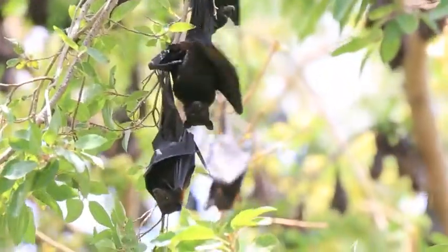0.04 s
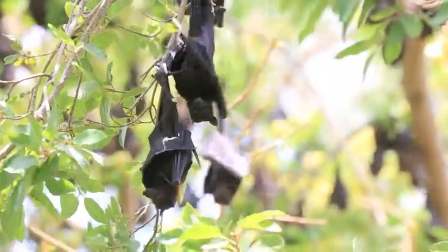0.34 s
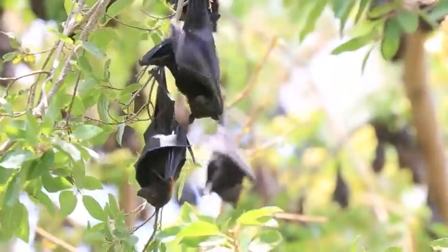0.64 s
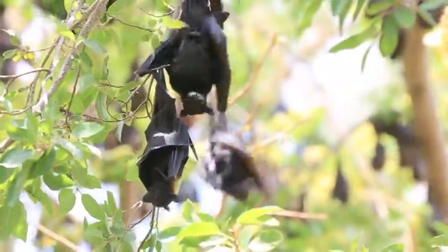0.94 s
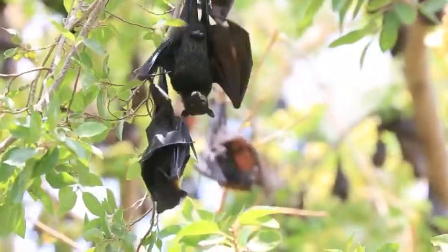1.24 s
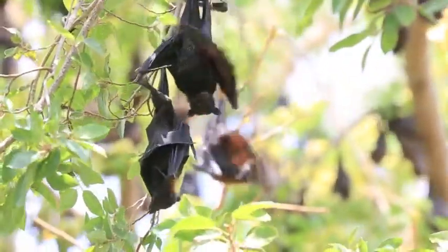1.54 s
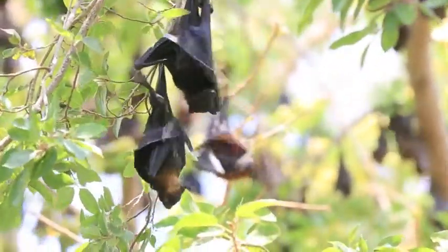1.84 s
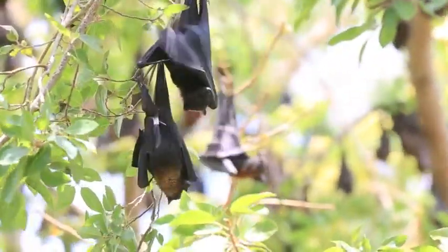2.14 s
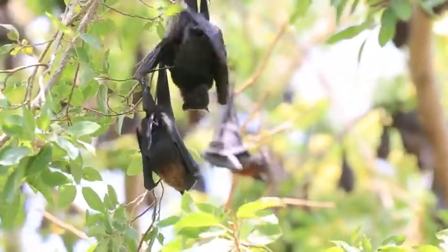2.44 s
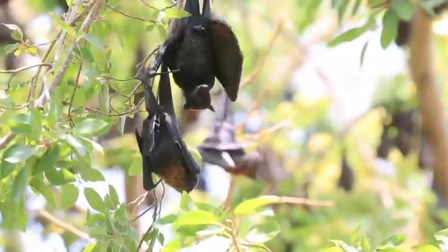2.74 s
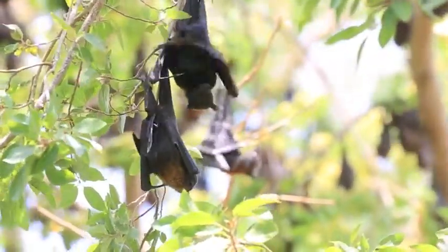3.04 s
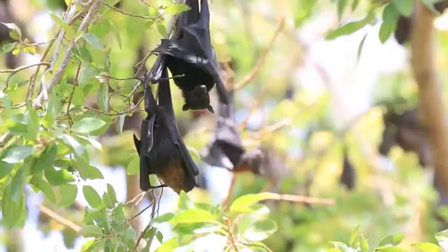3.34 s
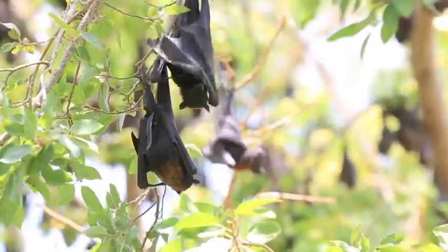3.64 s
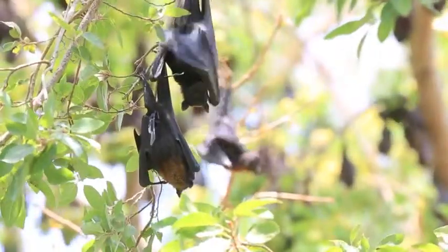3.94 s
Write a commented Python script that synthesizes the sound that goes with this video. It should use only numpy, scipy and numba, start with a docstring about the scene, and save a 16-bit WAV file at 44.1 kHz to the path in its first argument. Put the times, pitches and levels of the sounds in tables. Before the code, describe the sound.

Harsh screeches and squawks of quarrelling bats over faint colony chatter and low outdoor noise.

```python
"""Fruit bats squabble in a tree. First, thin whines break up into rasps, with a squeal between them and a
short growl. Hoarse screeches and a longer growl follow; last, a nearer bat squawks three times. Each
call is vocal fold vibration and pulsed breath noise filtered by the throat. Along the way the colony
squeaks and wings rustle; the trees scatter it all over a low outdoor background with a distant hum."""
import sys
import numpy as np
from scipy import signal
from scipy.fft import rfft, irfft
from scipy.io import wavfile
from scipy.ndimage import uniform_filter1d
from numba import njit

SR = 44100
rng = np.random.default_rng(int(sys.argv[2]) if len(sys.argv) > 2 else 0)


def file_out(sig):
    """Save sig as 16-bit WAV at sys.argv[1]."""
    # one column per channel
    cols = np.atleast_2d(sig).T
    # limit, then scale
    lim = np.clip(cols, -1, 1)
    pcm = np.round(lim * 32767).astype(np.int16)
    wavfile.write(sys.argv[1], SR, pcm)


N = 176400
TOP_HZ = 15750


def undb(db):
    """Amplitude ratio of a level in decibels."""
    return 10 ** (np.asarray(db) / 20)


def unit(x):
    """Normalisation to a standard deviation of 1."""
    return x / (np.std(x) + 1e-12)


def steady(x):
    """Division by the running rms, which flattens the envelope."""
    return x / np.sqrt(uniform_filter1d(x ** 2, SR // 35) + 1e-12)


def along(rows, column):
    """Linear interpolation of one table column over time."""
    rows = np.array(rows, float)
    return np.interp(np.arange(N) / SR, rows[:, 0], rows[:, column])


def colour(x, response):
    """Zero-phase filtering by a response given as (f/Hz, level/dB) points."""
    hz, db = np.array(response, float).T
    bin_hz = np.arange(N // 2 + 1) * SR / N
    return irfft(rfft(x) * undb(np.interp(np.log(bin_hz + 1), np.log(hz), db)), N)


def lowpass(x, hz, order):
    """Zero-phase low-pass filtering."""
    bin_hz = np.arange(N // 2 + 1) * SR / N
    return irfft(rfft(x) / (1 + (bin_hz / hz) ** order), N)


def wander(hz):
    """Band-limited random fluctuation with a standard deviation of 1."""
    return unit(lowpass(rng.standard_normal(N), hz, order=4))


def gate(start, end, edge_s):
    """Trapezoidal envelope between two times."""
    t = np.arange(N) / SR
    return np.clip(np.minimum(t - start, end - t) / edge_s + .5, 0, 1)


def phase_of(hz):
    """Phase as the time integral of frequency."""
    return 2 * np.pi * np.cumsum(hz) / SR


def vocal_folds(phase, harmonics, ring_harmonic, ring_db):
    """Harmonic series of a periodic vibration; each harmonic swells and fades on its own."""
    t = np.arange(N) / SR
    drift_hz, drift_db = 45.06, 4.5
    folds = 0
    for k in range(1, harmonics + 1):
        drift = np.interp(t * drift_hz, np.arange(N // 200), rng.standard_normal(N // 200))
        gain = undb(drift_db * drift + ring_db * (k == ring_harmonic))
        folds += gain * np.cos(k * phase + rng.uniform(0, 2 * np.pi))
    return unit(folds)


@njit
def mouth_resonance(x, hz, width_hz):
    """The mouth cavity as a second-order resonator with a moving centre frequency."""
    y, band_state, low_state = np.empty(len(x)), 0., 0.
    for i in range(len(x)):
        tuning, damping = np.tan(np.pi * hz[i] / SR), width_hz / hz[i]
        band = (band_state + tuning * (x[i] - low_state)) / (1 + tuning * (tuning + damping))
        band_state = 2 * band - band_state
        low_state += 2 * tuning * band
        y[i] = damping * band
    return y


def call(pitch, levels, throat, split_hz, jitter, waver, flutter, sidebands,
         rasp=.45, hoarse=.8, ring_harmonic=None, ring_db=0, mouth=False):
    """Source-filter principle: uneven vocal fold pulses and pulsed air excite the throat's resonances."""
    rough = np.clip(along(pitch, 2), 0, 1)
    hz = along(pitch, 1) * (1 + waver * wander(60.55) + jitter * rough * wander(427.4))
    phase = phase_of(hz)
    folds = vocal_folds(phase, int(TOP_HZ / np.median(hz)), ring_harmonic, ring_db)
    # in rough stretches a slower vibration modulates the folds and adds side tones
    slow_phase = phase / 5 + .5 * wander(70)
    subharmonics = sum(np.cos(k * slow_phase + rng.uniform(0, 2 * np.pi)) for k in (1, 2, 3))
    folds *= 1 + sidebands * rough * subharmonics
    breath = unit(rng.standard_normal(N) * (1 + 1.1 * np.cos(phase)))
    shimmer = np.exp(flutter * (.043 + rough) * wander(140))
    source = (np.sqrt(1 - rough ** 2) * folds + rasp * rough * breath) * shimmer
    if mouth:  # part of the source leaks past the resonance
        source = .25 * source + mouth_resonance(source, along(pitch, 3), width_hz=700.)
    body = lowpass(colour(source, throat), split_hz, order=16)
    # a hoarser mix supplies the band above split_hz
    hoarse_source = ((1 - rough) * folds * np.exp(.28 * wander(27)) + hoarse * breath) * shimmer
    treble = colour(hoarse_source, throat)
    treble -= lowpass(treble, split_hz, order=16)
    sound = steady(body) * undb(along(levels, 1)) + steady(treble) * undb(along(levels, 2))
    return sound * gate(levels[0][0], levels[-1][0], edge_s=.0078)


SQUAWK_PITCHES = [
    [(2.725, 580, .8), (2.752, 539, .35), (2.775, 548, .65), (2.8, 585, .75), (2.82, 580, .85),
     (2.845, 612, .75), (2.89, 581, .75), (2.96, 555, .8)],
    [(3.095, 595, .5), (3.12, 578, .65), (3.135, 540, .55), (3.16, 557, .8), (3.2, 542, .6),
     (3.255, 556, .6), (3.27, 489, .5), (3.29, 472, .55), (3.318, 550, .95), (3.345, 505, .55),
     (3.385, 482, .5), (3.405, 517, .85), (3.5, 496, .95)],
    [(3.63, 529, .6), (3.67, 554, .85), (3.7, 490, .95), (3.735, 445, .7), (3.77, 467, .5),
     (3.825, 470, .75), (3.87, 538, .9), (3.9, 513, .6), (3.925, 538, .9), (4, 490, .6)],
]  # contour per call: t/s, f/Hz, roughness (0-1)
SQUAWK_LEVELS = [
    [(2.72, -43, -48), (2.748, -27.5, -44), (2.772, -32, -46), (2.793, -27.5, -39), (2.885, -29, -40),
     (2.92, -36.5, -47), (2.96, -40.5, -41.5), (3.08, -53, -48.5)],
    [(3.095, -34, -41), (3.113, -25, -46), (3.14, -29.5, -41.5), (3.2, -33, -39), (3.3, -32, -41),
     (3.41, -31.5, -40.5), (3.5, -43.5, -51), (3.64, -61, -52)],
    [(3.635, -43, -47), (3.675, -31, -42), (3.72, -39.5, -45), (3.77, -31.5, -44.5), (3.85, -41, -47.5),
     (3.875, -34, -44.5), (3.905, -40, -50), (3.95, -33.5, -49), (4, -44, -61)],
]  # envelope per call: t/s, body level/dB, treble level/dB
SQUAWK_FORMANTS = [(900, -42), (1600, -23), (2150, -1), (2850, 1), (3450, -13), (4000, -9), (4750, -7.5),
                   (5500, -19), (7000, -26), (9500, -36.5), (15500, -47)]  # throat response: f/Hz, level/dB
def squawks():
    """Resonance: the fifth harmonic of three hoarse nasal calls rings in the throat."""
    return undb(1.4) * sum(
        call(pitch, levels, SQUAWK_FORMANTS, split_hz=3600, jitter=.021, waver=.016,
             flutter=.14, sidebands=.42, rasp=.42, ring_harmonic=5, ring_db=3.5)
        for pitch, levels in zip(SQUAWK_PITCHES, SQUAWK_LEVELS))


SCREECH_PITCHES = [
    [(1.34, 1540, .4, 4500), (1.39, 1500, .5, 4400), (1.44, 1390, .7, 3900), (1.5, 1500, .7, 4600),
     (1.55, 1150, .7, 3400), (1.58, 1300, .8, 4000)],
    [(1.595, 1300, .6, 4400), (1.615, 1650, .7, 4000), (1.64, 1380, .7, 3100), (1.67, 1400, .5, 4150),
     (1.72, 1310, .7, 3750), (1.78, 1430, .8, 3850), (1.83, 1250, .85, 3800), (1.91, 1200, .9, 3500)],
]  # contour per call: t/s, f/Hz, roughness (0-1), mouth f/Hz
SCREECH_LEVELS = [
    [(1.34, -46.5, -54.5), (1.43, -33.5, -57), (1.49, -34, -50), (1.555, -37, -55), (1.58, -37, -58)],
    [(1.595, -38, -56), (1.62, -32, -53), (1.71, -30.5, -48.5), (1.79, -30.5, -48), (1.87, -37.5, -59),
     (1.91, -64, -64)],
]  # envelope per call: t/s, body level/dB, treble level/dB
SCREECH_FORMANTS = [(900, -64), (1800, -6), (2650, 5.5), (3900, -2), (5000, -0.5), (6500, -16.5),
                    (8000, -14), (10300, -20), (12000, -26.5), (15500, -32)]  # throat response: f/Hz, level/dB
def screeches():
    """Random frequency modulation: high screams flick about in pitch as the mouth resonance swings."""
    return undb(1.5) * sum(
        call(pitch, levels, SCREECH_FORMANTS, split_hz=6600, jitter=.085, waver=.075,
             flutter=.22, sidebands=.9, hoarse=.4, mouth=True)
        for pitch, levels in zip(SCREECH_PITCHES, SCREECH_LEVELS))


WHINE_PITCHES = [
    [(0, 1630, .2), (.1, 1570, .05), (.15, 1569, .57), (.23, 1576, .43), (.29, 1568, .37), (.37, 1527, .35)],
    [(.63, 1657, .06), (.78, 1635, .15), (.85, 1665, .45), (.91, 1615, .25), (.97, 1570, .75),
     (1.05, 1570, .95), (1.12, 1520, .9), (1.19, 1590, .1), (1.3, 1573, .3)],
]  # contour per call: t/s, f/Hz, roughness (0-1)
WHINE_LEVELS = [
    [(0, -52, -52), (.06, -41.5, -48), (.13, -33.5, -45), (.22, -36, -46), (.34, -35.5, -55),
     (.37, -35, -63)],
    [(.63, -52, -51), (.67, -43, -62), (.745, -44.5, -59), (.83, -35, -49.5), (.905, -42.5, -46),
     (.97, -31, -46), (1.055, -41, -47.5), (1.13, -64, -47.5), (1.28, -70, -85)],
]  # envelope per call: t/s, body level/dB, treble level/dB
WHINE_FORMANTS = [(900, -29), (1600, -19.5), (2200, -6), (2600, 1), (3150, -5.5), (3900, -12), (5000, -6),
                  (6500, -14), (8000, -19), (9900, -14), (12000, -29), (15500, -38)]  # throat response: f/Hz, level/dB
def whines():
    """Subharmonic modulation and breath noise break thin wavering cries into a rasp."""
    return undb(1.2) * sum(
        call(pitch, levels, WHINE_FORMANTS, split_hz=4430, jitter=.025, waver=.009,
             flutter=.32, sidebands=.8, ring_harmonic=2, ring_db=3)
        for pitch, levels in zip(WHINE_PITCHES, WHINE_LEVELS))


GROWL_PITCHES = [
    [(1.01, 400, .8, 2850), (1.05, 375, .8, 2620), (1.08, 355, .5, 2400), (1.115, 345, .4, 2150)],
    [(1.95, 420, .9, 3200), (2.06, 440, .8, 3350), (2.13, 450, .7, 3650), (2.19, 450, .75, 3600),
     (2.24, 425, .85, 2900), (2.32, 415, .9, 2650), (2.4, 400, .95, 2700), (2.55, 380, .95, 2600)],
]  # contour per call: t/s, f/Hz, roughness (0-1), mouth f/Hz
GROWL_LEVELS = [
    [(1.01, -39.5, -62), (1.05, -32, -59), (1.08, -39, -64), (1.115, -41, -62)],
    [(1.95, -47, -51), (2.05, -40.5, -60), (2.11, -34, -46.5), (2.19, -33.5, -49), (2.26, -35.5, -45.5),
     (2.32, -40.5, -50), (2.4, -36.5, -47.5), (2.47, -48, -49), (2.55, -71, -55)],
]  # envelope per call: t/s, body level/dB, treble level/dB
GROWL_FORMANTS = [(900, -26), (1800, -6), (2200, -3.5), (2650, -3), (4000, -3.5), (5000, 2), (6000, -1),
                  (7500, -9.5), (10000, -19), (15500, -27)]  # throat response: f/Hz, level/dB
def growls():
    """Formant glide: low ragged calls darken as the closing mouth lowers its resonance."""
    return sum(
        call(pitch, levels, GROWL_FORMANTS, split_hz=4800, jitter=.016, waver=.012,
             flutter=.14, sidebands=.35, mouth=True)
        for pitch, levels in zip(GROWL_PITCHES, GROWL_LEVELS))


SQUEAL_CONTOUR = [(.37, 1688, .1), (.41, 1632, .8), (.47, 1398, .05), (.5, 1512, .05), (.55, 1467, .05),
                  (.578, 1508, .1), (.602, 1270, .3)]  # contour: t/s, f/Hz, roughness (0-1)
SQUEAL_ENVELOPE = [(.36, -53, -54), (.385, -38, -42.5), (.47, -34, -46.5), (.53, -46, -44),
                   (.595, -42, -44.5), (.62, -82, -56)]  # envelope: t/s, body level/dB, treble level/dB
SQUEAL_FORMANTS = [(900, -36), (1600, -11.5), (2900, 20), (3500, -3), (4500, 2.5), (5900, -8), (7400, -9.5),
                   (9000, -12), (10500, -18.5), (13000, -31), (15500, -38)]  # throat response: f/Hz, level/dB
def squeal():
    """A formant near the second harmonic brightens a raspy cry whose pitch drops at the end."""
    return call(SQUEAL_CONTOUR, SQUEAL_ENVELOPE, SQUEAL_FORMANTS, split_hz=4400, jitter=.04,
                waver=.016, flutter=.25, sidebands=.34, rasp=.65)


SQUEAK_NOTES = [(0.577, 0.019, 4500, 3760, -36.5), (.665, .04, 3780, 3480, -38),
                (1.287, 0.04, 4680, 3790, -44.5), (1.29, 0.049, 5780, 5140, -47.5),
                (1.155, .11, 1400, 1462, -49), (2.055, 0.014, 3300, 3210, -36.5),
                (2.396, 0.1, 3930, 3900, -41.5), (2.48, 0.025, 5900, 5130, -41),
                (2.587, 0.035, 3990, 4026, -46), (2.632, .028, 5400, 4850, -46),
                (2.676, 0.033, 2900, 2580, -42.5), (2.701, .025, 2650, 3100, -40),
                (2.936, 0.027, 5220, 5020, -40), (2.932, 0.04, 5900, 5700, -44),
                (3.008, .045, 4040, 3980, -43.5), (3.05, 0.038, 3700, 3520, -43.5)]  # notes: t/s, duration/s, start f/Hz, end f/Hz, level/dB
def squeaks():
    """Linear frequency sweeps: short notes from other bats, unsteady in pitch and amplitude."""
    out = 0
    for start, length, first_hz, last_hz, db in SQUEAK_NOTES:
        glide = along([(start, first_hz), (start + length, last_hz)], 1)
        hz = glide * (1 + .016 * wander(545) + .008 * wander(70))
        tone = np.sin(phase_of(hz)) * (1 + .4 * wander(200))
        out += undb(db) * gate(start, start + length, edge_s=.0046) * tone
    return out


WING_STROKES = [(.212, 0.035, -49), (3.916, 0.082, -46), (3.931, 0.035, -41)]  # brushes against leaves: t/s, duration/s, level/dB
RUSTLE_SPECTRUM = [(2000, -30), (4500, -12), (6500, 2.5), (9500, -8.5), (12000, -11), (15500, -28)]  # crackle spectrum: f/Hz, level/dB
def rustles():
    """Friction noise: wing skin brushes the leaves in a dense crackle."""
    friction = rng.standard_normal(N) * np.exp(.5 * wander(550))
    envelope = sum(undb(db) * gate(t, t + length, edge_s=.0062) for t, length, db in WING_STROKES)
    return unit(colour(friction, RUSTLE_SPECTRUM)) * envelope


def echoes(x, t60_s):
    """Reverberation: convolution with dense, exponentially decaying reflections."""
    t = np.arange(SR) / SR
    tail = rng.standard_normal(SR) * np.exp(-np.log(1000) * t / t60_s)
    return signal.fftconvolve(x, tail / np.linalg.norm(tail))[:N]


def trees(x):
    """Scattering: nearby leaves smear the calls; trunks farther off add a longer tail."""
    leaf_gain, trunk_gain = undb(-3), undb(-10)
    near = (x + leaf_gain * echoes(x, t60_s=.11)) / np.hypot(1, leaf_gain)
    return near + trunk_gain * echoes(near, t60_s=.62)


AIR_SPECTRUM = [(25, -11), (50, -6), (70, -2.5), (130, -1.5), (250, -3), (400, -4), (490, -2.5),
                (650, -9.5), (1000, -9.5), (1500, -7), (3000, -12.5), (6000, -21), (10000, -28),
                (15500, -38)]  # outdoor noise spectrum: f/Hz, level/dB
COLONY_SPECTRUM = [(1000, -18), (2000, 6.5), (3000, 11.5), (4500, 6), (7000, -7), (12000, -19)]  # far chatter spectrum: f/Hz, level/dB
def background():
    """Amplitude-modulated noise: outdoor air and the colony's far chatter swell and fade."""
    air = unit(colour(rng.standard_normal(N), AIR_SPECTRUM)) * undb(-43.5 + .5 * wander(13))
    colony = unit(colour(rng.standard_normal(N), COLONY_SPECTRUM)) * undb(-46 + .8 * wander(8.6))
    return air + colony


HUM_TONES = [(-.1, 0.95, 96.9, -50.5), (0.52, 0.36, 103, -45), (2.11, 0.34, 68.7, -49.5),
             (2.79, 0.51, 74.9, -49.5)]  # low tones: t/s, duration/s, f/Hz, level/dB
def distant_hum():
    """Slight frequency modulation makes low tones waver as they come and go."""
    out = 0
    for start, length, hz, db in HUM_TONES:
        tone = np.sin(phase_of(hz * (1 + .026 * wander(13.6))))
        out += undb(db) * gate(start, start + length, edge_s=.12) * tone
    return out


def scene():
    """Superposition of the bats in their tree and the background, the same in both channels."""
    bats = whines() + squeal() + screeches() + growls() + squawks() + squeaks() + rustles()
    mono = trees(bats) + background() + distant_hum()
    return np.array([mono, mono])


def record(dry):
    """Band limiting: a steep elliptic low-pass removes the highest treble."""
    return signal.sosfilt(signal.ellip(12, .1, 80, TOP_HZ, fs=SR, output="sos"), dry)


dry = scene()
out = record(dry)
file_out(out)
```